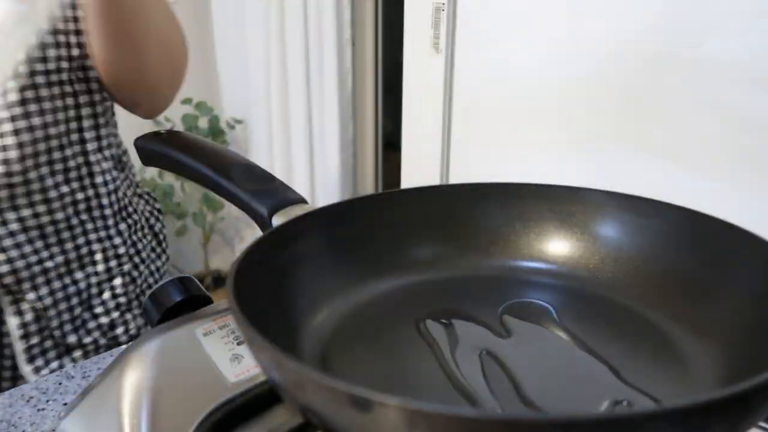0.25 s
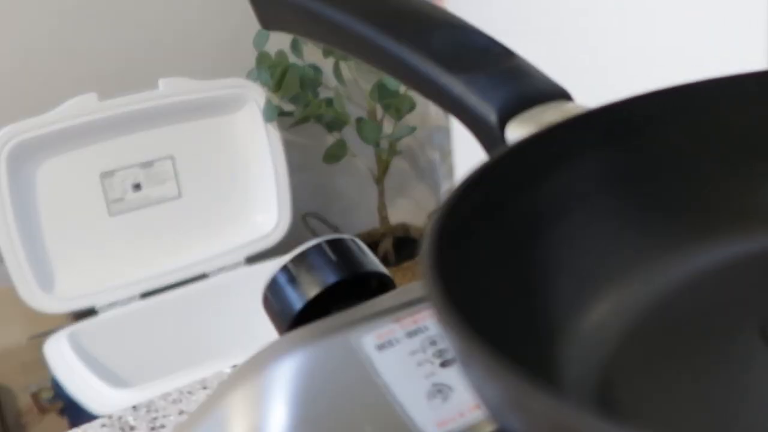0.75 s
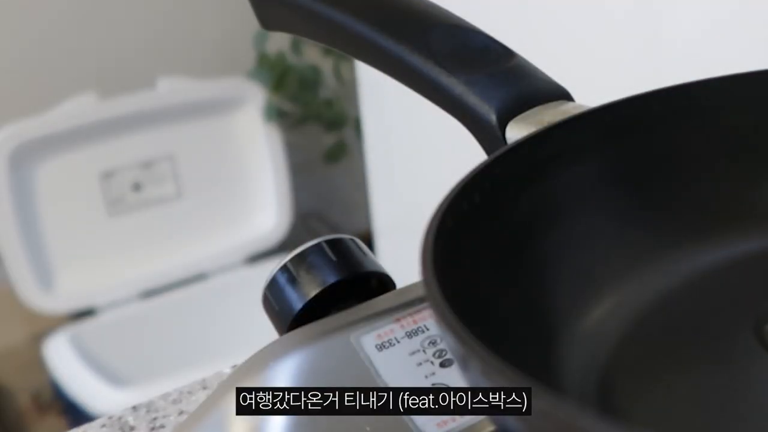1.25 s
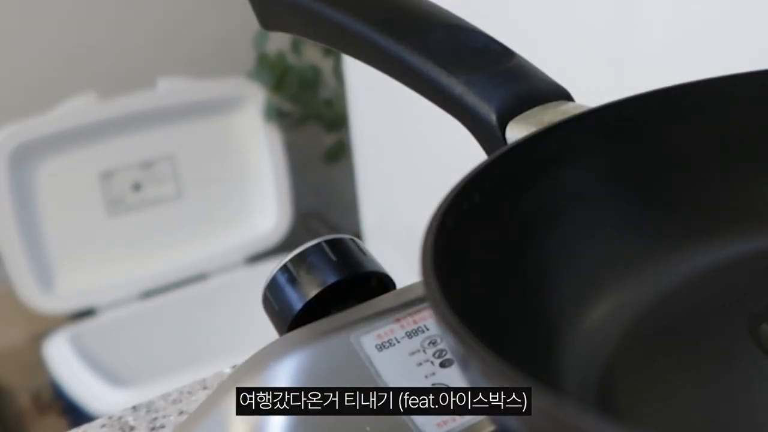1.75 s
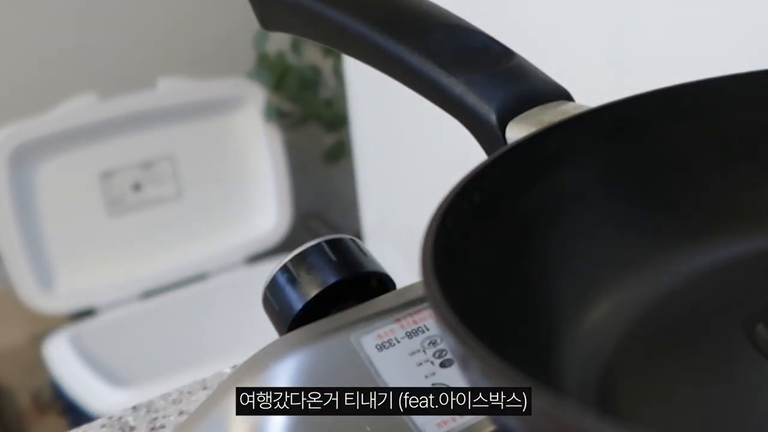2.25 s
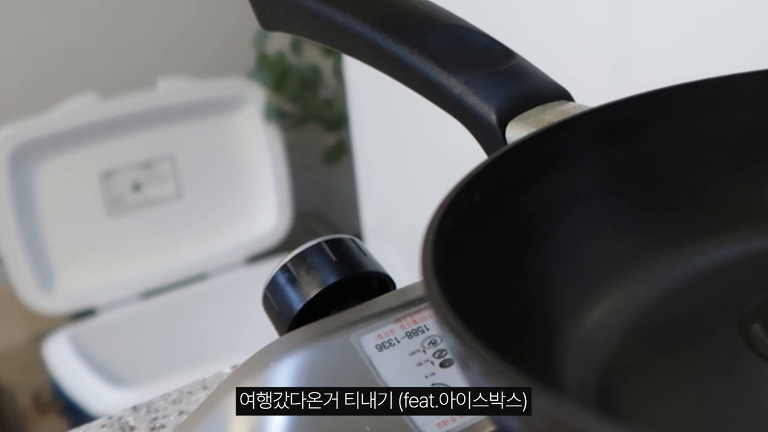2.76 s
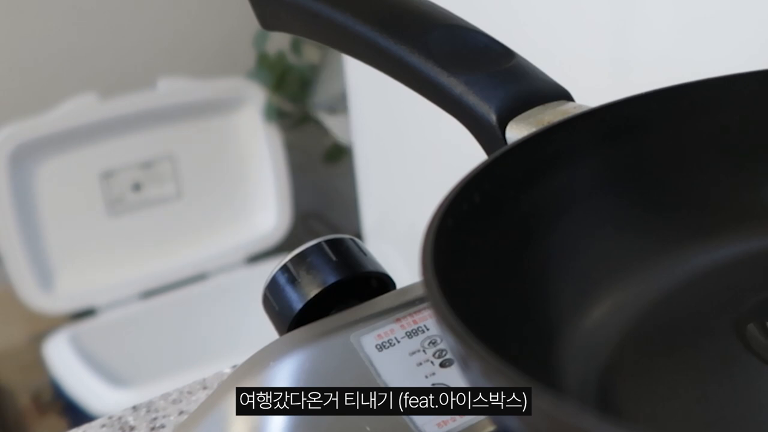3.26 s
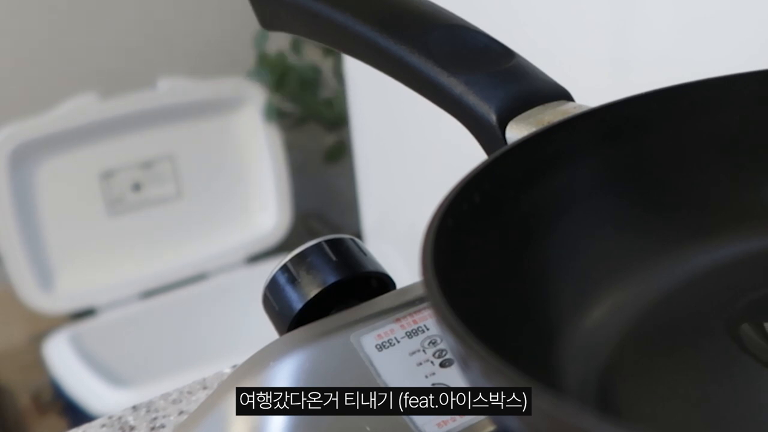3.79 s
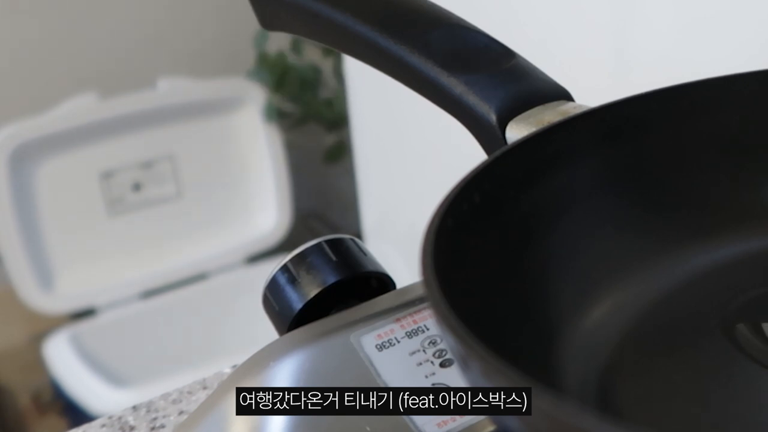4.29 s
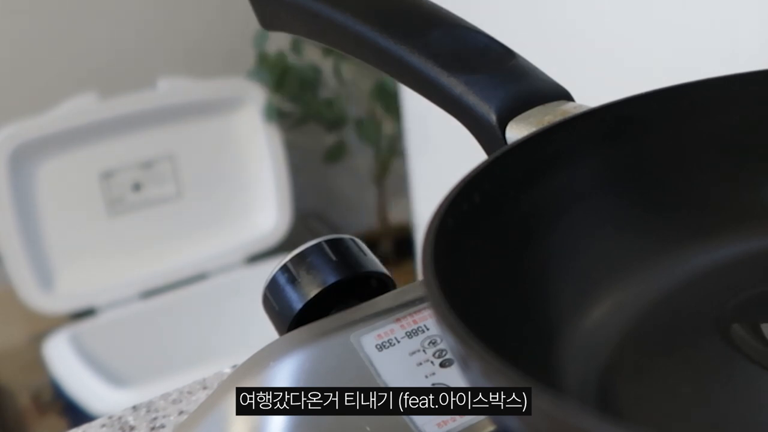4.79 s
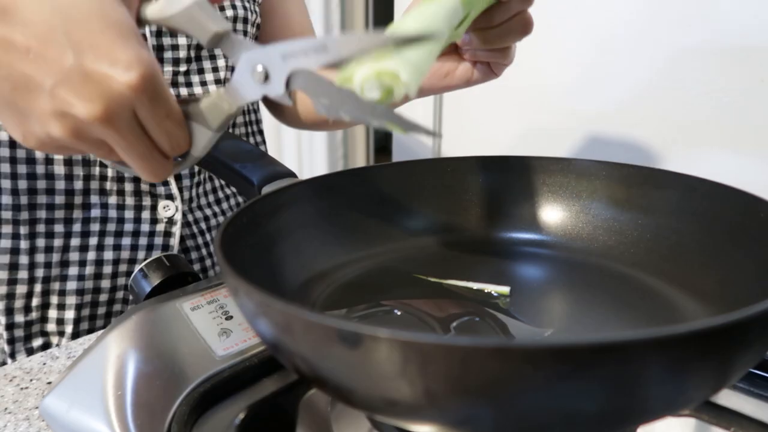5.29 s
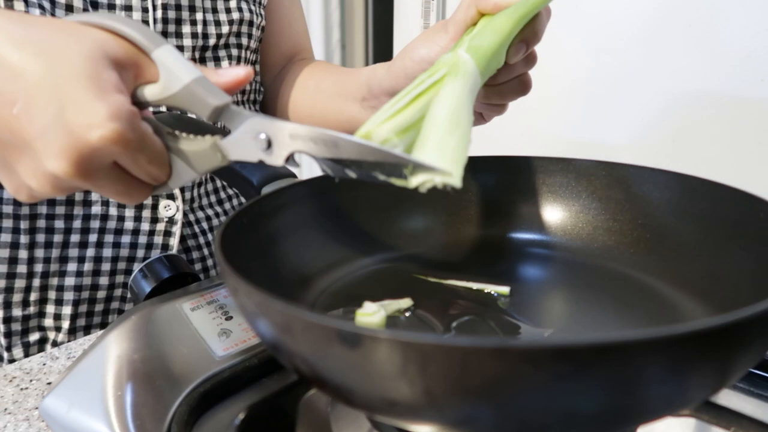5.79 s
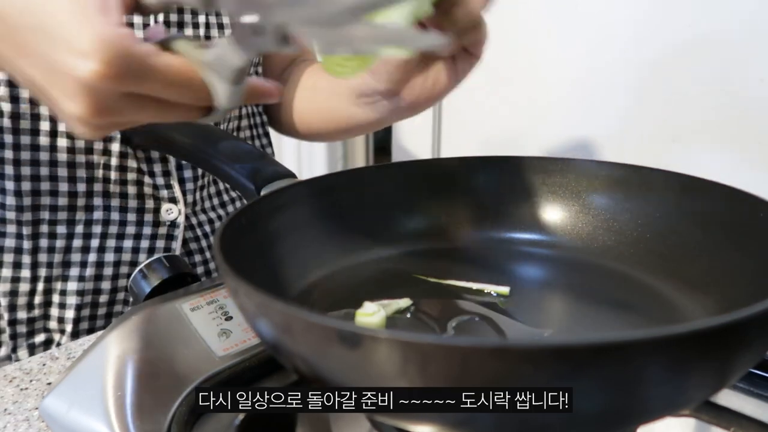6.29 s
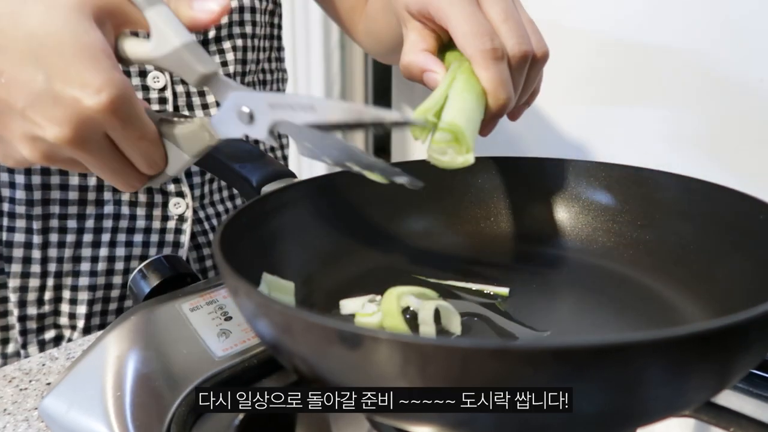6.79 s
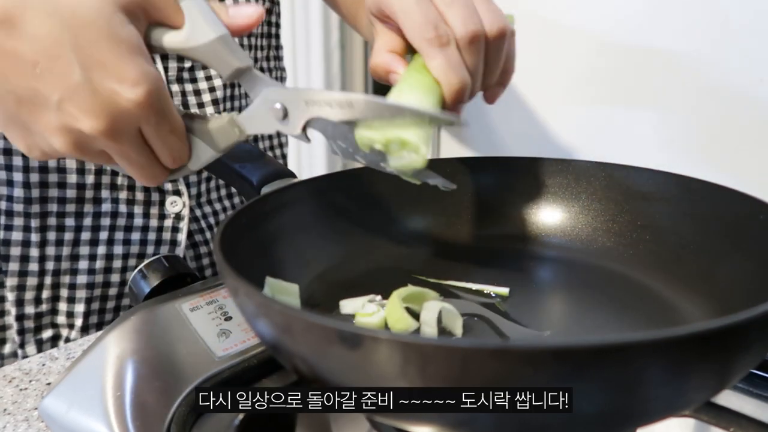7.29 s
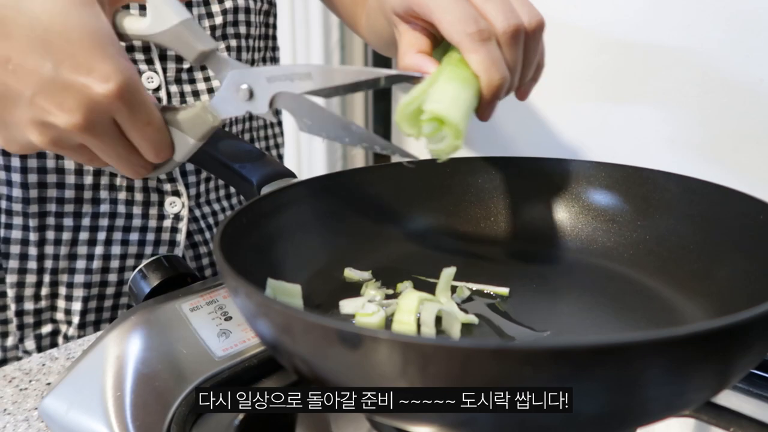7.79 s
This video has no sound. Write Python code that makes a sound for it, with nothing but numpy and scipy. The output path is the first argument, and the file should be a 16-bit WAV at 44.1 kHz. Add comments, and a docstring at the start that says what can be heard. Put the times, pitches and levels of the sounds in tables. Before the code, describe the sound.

Over a low kitchen drone, objects are set down on a worktop, then scissors crunch through a leek and slices plonk into a pan.

```python
"""In a small, lively home kitchen a stove drones while things are handled and set down on the worktop.
Then scissors crunch through a leek in several strokes, clash shut once, and slices plonk into an oiled pan.
Struck objects are sums of decaying modes with a noise clack; cutting is a crackle of tiny fractures through
the leek's spectrum; the drone is coloured noise with hum lines. Two closely spaced microphones hear
the scissors and pan close by and the worktop further off, each with a decaying room answer."""
import sys
import numpy as np
from scipy import signal
from scipy.fft import rfft, irfft, next_fast_len
from scipy.io import wavfile
from scipy.ndimage import uniform_filter1d, map_coordinates

SR = 44100
rng = np.random.default_rng(int(sys.argv[2]) if len(sys.argv) > 2 else 0)


def master_out(mix):
    """Clip the mix to full scale and print it as 16-bit PCM to the path in sys.argv[1]."""
    frames = np.transpose(np.atleast_2d(mix))
    ceiling = np.clip(frames, -1, 1)
    pcm = np.round(ceiling * 32767).astype(np.int16)
    wavfile.write(sys.argv[1], SR, pcm)


N = 355005
T = np.arange(SR // 2) / SR  # time within one hit, s

# Spectrum of the stove and room drone. Each row: frequency in Hz, relative density in dB per Hz.
DRONE = [(20, -30.5), (38, -17), (52, -9), (75, -2), (126, 1.5), (160, -6), (260, -9), (335, -4),
         (430, -15), (720, -14), (1050, -17), (2000, -22.5), (3260, -28.5), (3900, -32.5), (6000, -38),
         (11200, -47), (15500, -62)]
# Hum lines of the drone. Each row: frequency in Hz, level in dB.
HUM = [(54, -59), (86.1, -56.5), (118.4, -57), (133, -56.5), (344.5, -63.5), (597.5, -58), (931.3, -62.5)]
# Spectrum of the deepest part of the drone. Each row: frequency in Hz, relative density in dB per Hz.
RUMBLE = [(20, -27), (38, -15), (52, 2), (66, -12), (110, -36), (300, -82)]
# Course of that deep part. Each row: time in seconds, level in dB.
RUMBLE_LEVEL = [(0, -51), (1.9, -48.5), (2.8, -57), (8, -56)]

# Light taps of handling. Each row: start in seconds, level in dB, pitch in Hz, width in octaves, t60 in seconds.
TAPS = [(0.027, -44, 2500, 0.71, 0.023), (0.218, -39.5, 483, 0.63, 0.085), (0.224, -35, 755, 0.11, 0.091),
        (0.28, -47.5, 2200, 0.14, 0.072), (0.539, -31, 510, 0.77, 0.037), (0.55, -46, 846, 0.4, 0.023),
        (1.503, -39, 885, 1.5, 0.36), (1.646, -29.5, 287, 0.36, 0.043), (1.654, -31, 254, 0.33, 0.035),
        (2.965, -55, 4200, 0.9, 0.06), (3.293, -35.5, 310, 0.58, 0.14), (3.579, -54.5, 3500, 2.2, 0.07),
        (3.652, -40, 1790, 1.25, 0.26), (3.858, -42.5, 7300, 0.54, 0.18), (5.068, -57.5, 4470, 0.6, 0.051)]
# Things slide and rustle. Each row: start, attack, hold and release in seconds, level in dB.
RUSTLE = [(1.6, 0.07, .01, 0.16, -49.5), (1.8, 0.04, 0.048, .13, -49.5), (2.7, 0.11, .02, 0.13, -47.5),
          (2.89, 0.074, 0.0092, 0.073, -50.5), (2.98, 0.094, 0.24, 0.22, -46), (3.3, 0.22, 0.24, 0.48, -51),
          (6.98, 0.18, 0.047, 0.078, -50), (7.93, 0.06, .08, .1, -47.5)]
# Spectrum of sliding. Each row: frequency in Hz, relative density in dB per Hz.
SLIDING = [(400, -8), (1200, 11), (3000, 7), (6000, -4), (10000, -9), (15000, -22)]

# A heavy bottle meets the worktop, edge first. Each row: start in seconds, level in dB,
# contact brightness in Hz, clack against ring in dB.
BOTTLE_HITS = [(1.7885, -18.5, 4300, -10), (1.799, -18.5, 4000, -12.5), (1.8155, -31, 2600, -5)]
# Bottle modes. Each row: frequency in Hz, relative level in dB, t60 in seconds.
BOTTLE_MODES = [(132, -6.5, 0.22), (229, -11.5, 0.2), (301, 8, 0.039), (320, 8, 0.072), (620, -19, 0.09),
                (786, -14, 0.09), (902, -9.5, 0.068), (1091, -4, 0.078), (1458, -14, .12), (1580, -20, .12),
                (2034, -14, 0.094), (2520, -11.5, 0.085), (2950, -14, 0.083), (3550, -13.5, 0.059)]
# A plastic container clatters down on its base, then rocks onto its rim. Each row: start in seconds,
# level in dB, contact brightness in Hz, clack against ring in dB, place from 0 (base) to 1 (rim).
TUB_HITS = [(3.119, -28.5, 1500, 21, 0.6), (3.1318, -15, 8900, -2, 0.19), (3.1415, -21, 2600, -13, 0.31),
            (3.1455, -23, 980, -6, 0.1), (3.1883, -24.5, 9000, 2, 1), (3.194, -36, 13000, 12, 1),
            (3.199, -34, 7000, -4, 0.85)]
# Container modes. Each row: frequency in Hz, relative level in dB struck on the base,
# the same struck on the rim, t60 in seconds.
TUB_MODES = [(153, -6, -25, 0.13), (316, -8.5, -9, 0.14), (649.4, 0, -6, 0.17), (749, 5, 0, 0.11),
             (796, 6, -4, 0.074), (1040, 1, -14, 0.13), (1166, -5, -1, 0.15), (1277, -3, 2.5, 0.19),
             (1665, 2, -14, 0.077), (1900, -1, -17, 0.091), (2024, 13, 3, 0.035), (2430, 0, -7, 0.08),
             (2920, -9, 1, 0.15), (3190, -11, 7.5, 0.085), (5250, -8, -10, 0.11), (6200, -22, -2, 0.14)]
# Knocks on wooden kitchen units. Each row: start in seconds, level in dB, contact brightness in Hz,
# clack against ring in dB.
WOOD_HITS = [(4.530, -15, 6200, -9), (4.802, -32, 895, -2)]
# Modes of the wooden units. Each row: frequency in Hz, relative level in dB, t60 in seconds.
WOOD_MODES = [(100.4, -3, 0.22), (133, -5.5, 0.17), (226, 5.5, 0.13), (304.4, -0.5, 0.14), (353, -2, 0.108),
              (610, 0.5, 0.034), (750, 4.5, 0.049), (1060, -21, 0.064), (1654, -1.5, 0.022),
              (2050, -21, .08)]
# The dense, high vibrations of a struck thing. Each row: frequency in Hz, relative density in dB per Hz.
CLACK = [(60, -10), (200, -4.5), (330, 2), (470, 1.5), (700, 9), (2000, 3), (3300, 0.5), (4200, -3),
         (6300, -6.5), (8000, -10), (11000, -11.5), (15500, -19)]
CRACK_DB, CRACK_T60 = 2, 0.0079  # the instant of contact stands out of the clack: dB, s

# The blades squeeze the leek, the first stalk in several goes. Each row: start, attack, hold and release
# in seconds, strength of the squeeze in dB, sap fizz against that strength in dB.
CUTTING = [(5.288, 0.1, 0.11, 0.09, -39, -15), (5.518, 0.036, .012, 0.267, -33, -11.5),
           (5.755, .045, 0.013, 0.068, -41.5, -4.5), (5.964, 0.032, 0.004, 0.046, -31, -6),
           (6.419, 0.19, 0.04, 0.097, -29, -8), (7.241, 0.12, 0.11, 0.064, -31.5, -11)]
STROKE_RANGE_DB = 28.5  # a stroke swells by this much over its attack and sinks by as much over its release
# Spectrum of crushed leek. Each row: frequency in Hz, relative density in dB per Hz.
CRUNCH = [(240, -35), (400, -21), (560, -8), (820, -2), (1080, -4), (1450, 1), (1820, -5), (1930, -1),
          (2880, 0.5), (3570, 0.5), (3850, -2.5), (4500, -2.5), (5600, -6.5), (10900, -19.5), (12700, -15),
          (15500, -23)]
# Whole layers of leek snap, or the blades tick. Each row: start in seconds, level in dB, rise in seconds,
# t60 in seconds, pitch in Hz.
SNAPS = [(5.275, -54.5, 0.002, 0.062, 4500), (5.368, -45, 0.0033, 0.039, 1100),
         (5.3755, -29.5, 0.0049, 0.018, 4400), (5.376, -31.5, 0.0037, 0.04, 940),
         (5.4224, -37.5, 0.0018, 0.032, 3080), (5.4669, -33, .001, 0.04, 2480),
         (5.519, -40.5, .015, 0.053, 2900), (5.553, -25.5, 0.025, 0.11, 1830),
         (5.568, -27.5, .02, 0.044, 4100), (5.607, -38, .006, 0.091, 3000), (5.659, -47, .003, 0.057, 3100),
         (5.697, -47, .003, 0.044, 4500), (5.883, -47.5, .002, 0.019, 2940),
         (5.988, -35.5, .006, 0.033, 2180), (6.361, -44, 0.0019, 0.038, 3500),
         (6.4668, -43.5, .001, 0.058, 3500), (6.491, -39, .003, 0.1, 3200),
         (6.5188, -37.5, 0.007, 0.13, 3500), (6.546, -35, 0.0028, 0.055, 3200),
         (6.591, -27.5, .01, 0.096, 4600), (6.603, -29.5, .004, 0.04, 3520), (6.621, -38, .003, 0.05, 4400),
         (6.6419, -22.5, 0.0026, 0.028, 3640), (6.644, -28.5, 0.0055, 0.045, 1420),
         (6.68, -38, .008, 0.068, 3730), (7.306, -47, .003, 0.12, 3320), (7.349, -43, .002, 0.07, 3590),
         (7.381, -34.5, .006, 0.074, 3400), (7.398, -34, .004, 0.08, 3500), (7.442, -40, .002, 0.03, 3500),
         (7.4628, -26.5, 0.0037, 0.052, 2800), (7.49, -42, .002, 0.056, 3200)]
SNAP_COLOUR_DB = 4  # scatter of each snap's spectrum
SNAP_PEAK_DB, SNAP_WIDTH_OCT = 6.5, 0.23  # each layer favours its own pitch
# Thin skins give way one after another while the blades press.
SKIN_GAP_S, SKIN_SCATTER = .014, 0.32  # typical gap, and its scatter as a share of the gap
SKIN_DB, SKIN_UNEVEN_DB = -10.5, 1.5  # strength against the squeeze, and its scatter
SKIN_RISE_S, SKIN_T60 = 0.0017, 0.028  # s
SKIN_HZ, SKIN_SPREAD_OCT = 3450, .4  # typical pitch and its scatter
# Response of the sap fizz. Each row: frequency in Hz, gain in dB.
FIZZ = [(2500, -26), (6000, 5.0), (13000, -7.0), (15500, -8)]

# Slices land in the pan, the first one in two touches. Each row: start in seconds, level in dB,
# damping factor, place from 0 (side) to 1 (middle), time in seconds until the slice flops over.
DROPS = [(5.801, -22, 1.5, 0.044, 0.012), (5.8077, -23.5, 1.34, 0.29, 0.009),
         (6.7755, -22.5, 1.16, 0.71, .035)]
# Pan modes. Each row: frequency in Hz, relative level in dB struck at the side, the same struck in the middle,
# undamped t60 in seconds.
PAN_MODES = [(895, 6.5, -5.5, 0.1), (1556, 6.5, -9, 0.14), (1676, -6, -13, 0.053), (1613, -20, 8.5, 0.06),
             (1900, -22, 0, 0.025), (2544, 17.5, -31, 0.023), (3750, -12, -22, .06)]
# A slice's soft contact. Each row: frequency in Hz, relative density in dB per Hz.
PAT = [(80, -7), (260, 6), (520, -21), (900, -8), (1800, 8.5), (3000, -2), (6000, -17), (15000, -34)]
FLOP_DB, FLOP_T60 = -23, 0.092  # the wet flop: dB against the landing, s

# The blades slip through and clash shut. Each row: start in seconds, level of the clack in dB.
CLASHES = [(5.9931, -21.5)]
# Spectrum of the clash. Each row: frequency in Hz, relative density in dB per Hz.
CLASH = [(120, -20), (350, -9), (780, 5), (1050, -12), (1500, -4), (2200, 7), (3000, 0.5), (4100, 4.5),
         (5400, -1.5), (7300, -1), (9500, -13.5), (15500, -33)]
# Faint ring of the steel blades. Each row: frequency in Hz, relative level in dB, t60 in seconds.
BLADE_MODES = [(1700, -3, 0.54), (2190, 2, .25), (2460, -3, 0.16), (2980, 4, 0.19), (3704, -9, 0.18),
               (5280, -4, 0.12), (6800, -9, 0.22), (7170, -1, 0.25), (7620, -6, 0.2), (7950, 1, .18),
               (9100, -2, 0.21)]
CLASH_T60, STEEL_DB = 0.03, -13.5  # the dry clack in s; the ring of the steel against it in dB

# Reverberation of the kitchen. Each row: frequency in Hz, t60 in seconds.
ROOM = [(100, 0.41), (500, 0.23), (2000, 0.33), (7000, 0.43), (15000, 0.15)]
# Coherence of diffuse sound. Each row: frequency in Hz, left-right likeness from -1 to 1.
ALIKE = [(60, .9999), (150, 1), (400, 0.91), (1200, 0.91), (3000, 0.76), (5500, -0.089), (10000, -0.5)]
TOP_HZ = 15650  # upper band limit


def amp(db):
    """Logarithmic level: decibels to gain."""
    return 10 ** (np.asarray(db) / 20)


def unit(x):
    """Mean power: scale to rms 1."""
    return x / np.sqrt(np.mean(x ** 2) + 1e-20)


def punch(x):
    """Energy of a transient: scale a hit to that of a fiftieth of a second at rms 1."""
    return x / np.sqrt(np.sum(x ** 2) * 50 / SR + 1e-20)


def fade(t60):
    """Exponential decay: a fall of 60 dB in t60 seconds, no shorter than a millisecond."""
    return np.exp(-np.log(1000) * T / max(t60, 1e-3))


def burst_of_noise(envelope):
    """Random excitation: white noise shaped over one hit."""
    return rng.standard_normal(len(T)) * envelope


def along(points, hz):
    """Logarithmic frequency scale: interpolate (Hz, value) points."""
    f, v = np.transpose(points)
    return np.interp(np.log(hz + 1), np.log(f + 1), v)


def wobble(rate):
    """Slow random modulation: a smooth curve with rate knots a second."""
    knots = rng.standard_normal(int(N * rate / SR) + 4)
    return map_coordinates(knots, [np.arange(N) * rate / SR])


def level(strokes):
    """Amplitude envelope of hand strokes: each swells, holds and dies away linearly in dB."""
    t, gain = np.arange(N) / SR, np.zeros(N)
    for s, attack, hold, release, db in strokes:
        before = np.maximum(1 - (t - s) / attack, 0)
        after = np.maximum(t - s - attack - hold, 0) / release
        gain += amp(db - STROKE_RANGE_DB * (before + after))
    return gain


def add(track, s, sound):
    """Superposition: mix a sound in at time s."""
    part = track[max(round(s * SR), 0):][:len(sound)]
    part += sound[:len(part)]


def filtered(x, response):
    """Linear filtering: multiply the spectrum by a complex response of frequency."""
    n = x.shape[-1]
    m = next_fast_len(n + SR // 8)
    return irfft(rfft(x, m) * response(np.fft.rfftfreq(m, 1 / SR)), m)[..., :n]


def coloured(x, spectrum, size=2048):
    """Minimum phase: a causal filter with the given (Hz, dB) spectrum, by folding its cepstrum."""
    cepstrum = irfft(np.log(amp(along(spectrum, np.fft.rfftfreq(size, 1 / SR)))))
    cepstrum[1:size // 2] *= 2
    cepstrum[size // 2 + 1:] = 0
    impulse = irfft(np.exp(rfft(cepstrum)))
    return signal.fftconvolve(x, impulse)[:len(x)]


def softened(x, corner_hz):
    """Contact stiffness: a softer contact excites fewer highs, here a second-order low-pass."""
    return filtered(x, lambda hz: 1 / (1 + 1j * np.sqrt(2) * hz / corner_hz - (hz / corner_hz) ** 2))


def crackle(count, per_second, spread_db):
    """Random impulses: tiny fractures at random moments and of very unequal sizes."""
    happens = rng.random(count) < per_second / SR
    sizes = amp(spread_db * np.clip(rng.standard_normal(count), -2, 2))
    return unit(happens * sizes * rng.choice([-1, 1], count))


def diffuse(pair):
    """Diffuse-field coherence: two unrelated signals become a sound from all sides at both microphones."""
    turn = lambda hz: np.arccos(np.clip(along(ALIKE, hz), -1, 1)) / 2
    mid, side = filtered(pair, lambda hz: np.array([np.cos(turn(hz)), np.sin(turn(hz))]))
    return np.array([mid + side, mid - side])


def room_tail():
    """Reverberation: diffuse noise that builds up, then decays at its own rate in each band."""
    hz, t, z = signal.stft(rng.standard_normal((2, len(T))), SR, nperseg=256)
    decay = np.exp(-np.log(1000) * t / along(ROOM, hz)[:, None])
    tail = signal.istft(z * decay, SR, nperseg=256)[1][:, :len(T)]
    tail = diffuse(tail * (1 - fade(0.029)))
    return tail / np.linalg.norm(tail[0])


def placed(x, lag_ms, room_db, left_db):
    """Arrival difference and reverberation: left lags by lag_ms and is shaded in the highs; the room answers."""
    def ports(hz):
        lag = np.exp(np.outer([-1j, 1j], np.pi * hz * lag_ms / 1000))
        return lag * amp(np.outer([left_db, 0], hz / (hz + 400)))

    answer = signal.oaconvolve(x[None], room_tail(), axes=1)[:, :N]
    return filtered(x, ports) + amp(room_db) * answer


def ring(modes, damping=1, blur=0):
    """Modal superposition: decaying modes, slightly new in strength each blow; loose parts blur their pitch."""
    out = np.zeros(len(T))
    for k, (hz, db, t60) in enumerate(modes):
        # the phase wanders more for higher modes: blur is a share of the pitch
        drift = np.cumsum(rng.standard_normal(len(T))) * np.sqrt(2 * np.pi * blur * hz / SR)
        phase = 2 * np.pi * hz * T + uniform_filter1d(drift, size=24)
        strength = (-1) ** k * amp(db + rng.normal(0, 1))
        out += strength * fade(t60 / damping) * np.sin(phase)
    return punch(out)


def struck(modes, place):
    """Modal excitation: the strength of each mode depends on where the blow lands."""
    return [(hz, first + place * (second - first), t60) for hz, first, second, t60 in modes]


def drone():
    """Broadband and tonal noise: a diffuse low rush, slightly unsteady hum lines and a deep rumble."""
    t = np.arange(N) / SR
    rush = unit(diffuse(np.array([coloured(noise, DRONE) for noise in rng.standard_normal((2, N))])))
    hum = sum(amp(db) * np.sin(2 * np.pi * hz * t + 0.34 * wobble(7.2)) for hz, db in HUM)
    rumble_gain = amp(np.interp(t, *np.transpose(RUMBLE_LEVEL)))
    rumble = rumble_gain * unit(coloured(rng.standard_normal(N), RUMBLE, size=8192))
    return amp(-42.5) * rush + hum + rumble


def taps():
    """Damped resonance: small contacts, each in one broad resonance; the lower its pitch, the duller its top."""
    out, grid = np.zeros(N), np.geomspace(30, SR / 2, 120)
    for s, db, pitch_hz, width, t60 in TAPS:
        resonance = 1 + (np.log2(grid / pitch_hz) / width) ** 2
        dulling = np.hypot(1, grid / (8 * pitch_hz))
        shape = -20 * np.log10(resonance * dulling)
        add(out, s, amp(db) * punch(coloured(burst_of_noise(fade(t60)), np.c_[grid, shape])))
    return out


def rustle():
    """Stick and slip: things are shifted about and gripped anew, in small uneven jerks."""
    jerks = amp(2 * wobble(28) + 2 * wobble(130))
    friction = jerks * crackle(N, per_second=3000, spread_db=1.5)
    return level(RUSTLE) * unit(coloured(friction, SLIDING))


def knocks(hits, modes, clack_t60, rise, blur=0):
    """Impact excitation: each blow rings an object's low modes and a short clack of dense high ones."""
    out = np.zeros(N)
    for s, db, bright_hz, clack_db in hits:
        envelope = fade(clack_t60) + amp(CRACK_DB) * fade(CRACK_T60)
        clack = punch(coloured(burst_of_noise(envelope), CLACK))
        blow = (ring(modes, blur=blur) + amp(clack_db) * clack) * (1 - fade(rise))
        add(out, s, amp(db) * punch(softened(blow, bright_hz)))
    return out


def bottle():
    """Modal impact: a heavy bottle meets the worktop."""
    return knocks(BOTTLE_HITS, BOTTLE_MODES, clack_t60=0.19, rise=0.0065, blur=0.02)


def tub():
    """Position-dependent modes: a plastic container clatters on its base and rocks onto its rim."""
    out = np.zeros(N)
    for *hit, place in TUB_HITS:
        out += knocks([hit], struck(TUB_MODES, place), clack_t60=0.23, rise=0.0072, blur=0.017)
    return out


def wood():
    """Heavily damped modes: knocks on wooden kitchen units."""
    return knocks(WOOD_HITS, WOOD_MODES, clack_t60=0.2, rise=0.00088)


def squeeze():
    """Applied load: how hard the blades press, as a gain per sample."""
    return level([row[:5] for row in CUTTING])


def skins(count=200):
    """Successive failure: small snaps at uneven gaps, each following the squeeze; rows as in SNAPS."""
    scatter = SKIN_SCATTER * rng.standard_normal(count)
    times = CUTTING[0][0] + SKIN_GAP_S * (np.arange(count) + scatter)
    uneven = amp(SKIN_UNEVEN_DB * np.clip(rng.standard_normal(count), -2, 1.5))
    gains = np.interp(times, np.arange(N) / SR, squeeze()) * uneven
    pitches = SKIN_HZ * 2 ** (SKIN_SPREAD_OCT * rng.standard_normal(count))
    return [(s, 20 * np.log10(gain) + SKIN_DB, SKIN_RISE_S, SKIN_T60, hz)
            for s, gain, hz in zip(times, gains, pitches) if gain > amp(-60)]


def recoloured(spectrum, pitch_hz):
    """Spectral variation: the same spectrum with a chance offset at every point and a peak at one pitch."""
    grid = np.geomspace(100, SR / 2, 160)
    varied = along([(hz, db + SNAP_COLOUR_DB * rng.standard_normal()) for hz, db in spectrum], grid)
    peak = SNAP_PEAK_DB / (1 + (np.log2(grid / pitch_hz) / SNAP_WIDTH_OCT) ** 2)
    return np.c_[grid, varied + peak]


def scissors():
    """Fracture noise: cells burst in clumps under the blades; a layer giving way is an avalanche of them."""
    fibres = crackle(N, per_second=2800, spread_db=4.5) * amp(3 * wobble(160))
    cut = squeeze() * amp(-3) * unit(coloured(fibres, CRUNCH))
    for s, db, rise, t60, pitch_hz in SNAPS + skins():
        burst = crackle(len(T), per_second=14000, spread_db=2) * fade(t60) * (1 - fade(rise))
        add(cut, s, amp(db) * punch(coloured(burst, recoloured(CRUNCH, pitch_hz))))
    return cut


def juice():
    """Uncorrelated sources: sap fizzes out of crushed cells; the pan scatters its treble all around."""
    fizz = np.array([crackle(N, per_second=3200, spread_db=6.5) for _ in range(2)])
    fizz = filtered(fizz, lambda hz: amp(along(FIZZ, hz)))
    return level([(*stroke, db + fizz_db) for *stroke, db, fizz_db in CUTTING]) * unit(fizz)


def pan():
    """Damped plate modes: slices ring the base by where they land, pat and flop; slices in it damp the ring."""
    out = np.zeros(N)
    for s, db, damping, place, flop_s in DROPS:
        plonk = ring(struck(PAN_MODES, place), damping, blur=.008) * (1 - fade(0.0095))
        pat = punch(coloured(burst_of_noise(fade(0.062)), PAT))
        flop = punch(coloured(burst_of_noise(fade(FLOP_T60) * (1 - fade(0.011))), CRUNCH))
        add(out, s, amp(db) * (plonk + amp(-16.5) * pat))
        add(out, s + flop_s, amp(db + FLOP_DB) * flop)
    return out


def clash():
    """Impact of two plates: the blades shut with a dry, broad clack and a faint ring of steel."""
    out = np.zeros(N)
    for s, db in CLASHES:
        clack = punch(coloured(burst_of_noise(fade(CLASH_T60) * (1 - fade(0.0051))), CLASH))
        add(out, s, amp(db) * (clack + amp(STEEL_DB) * ring(BLADE_MODES, blur=.035)))
    return out


def scene():
    """Superposition of sources: worktop noises further off, scissors and pan close by, over the drone."""
    right = placed(bottle() + tub() + rustle(), lag_ms=0.037, room_db=-14.0, left_db=-0.8)
    left = placed(wood() + softened(taps(), corner_hz=6000), lag_ms=-0.037, room_db=-12.5, left_db=-0.3)
    cooking = placed(scissors() + clash() + pan(), lag_ms=0.03, room_db=-16.0, left_db=-1.0)
    return right + left + cooking + juice() + drone()


def record(dry):
    """Band limitation: nothing passes at or above TOP_HZ."""
    return filtered(dry, lambda hz: hz < TOP_HZ)


dry = scene()
out = record(dry)
master_out(out)
```